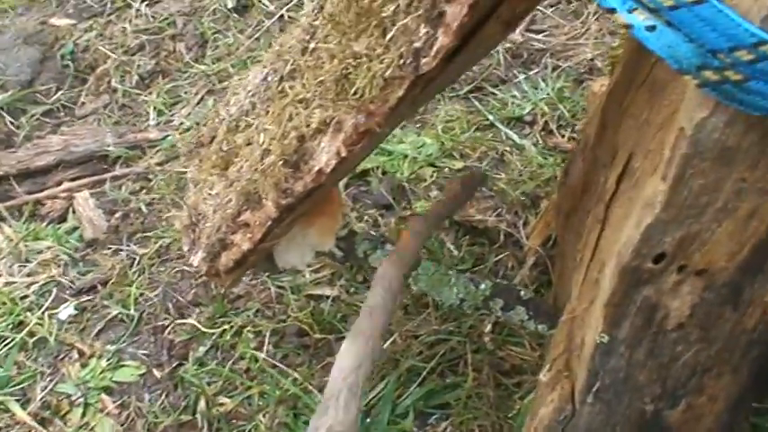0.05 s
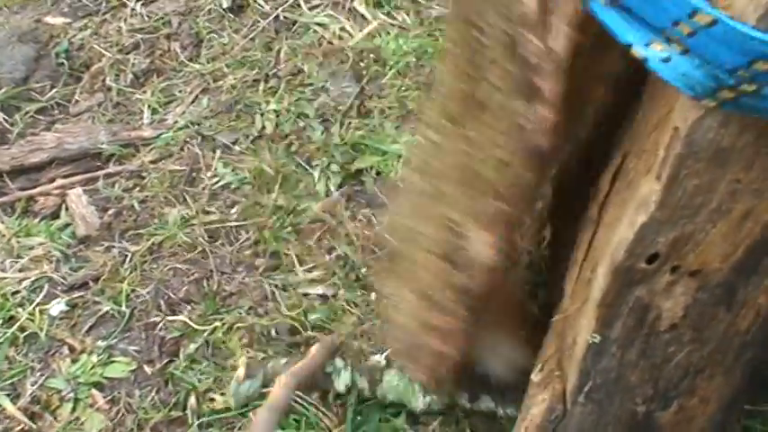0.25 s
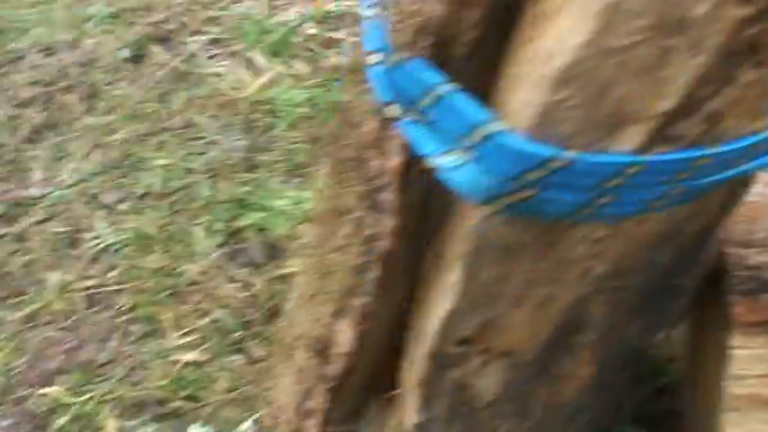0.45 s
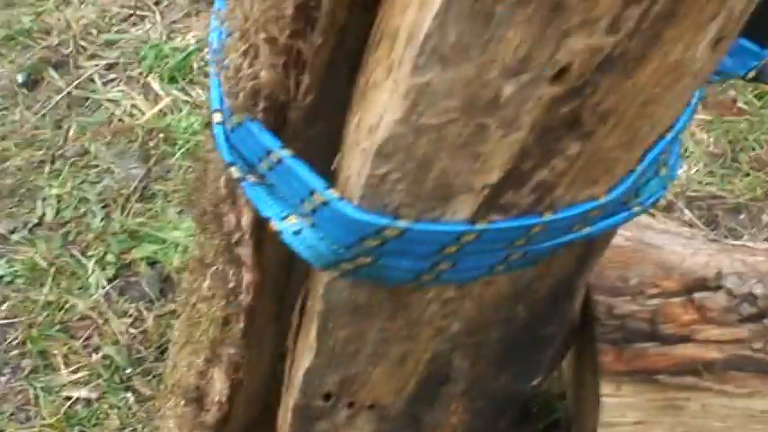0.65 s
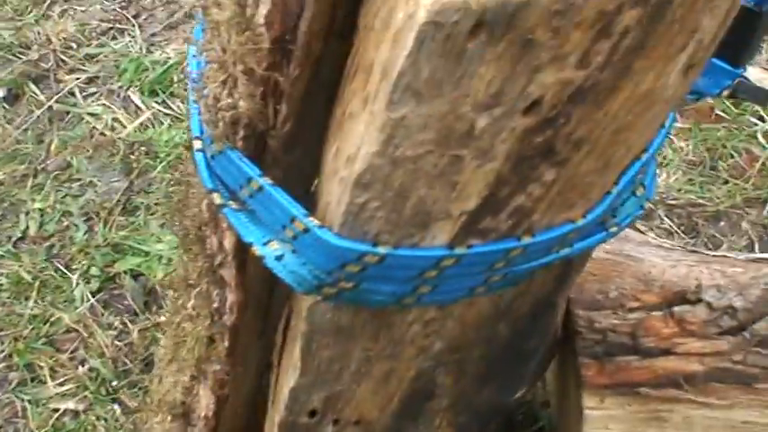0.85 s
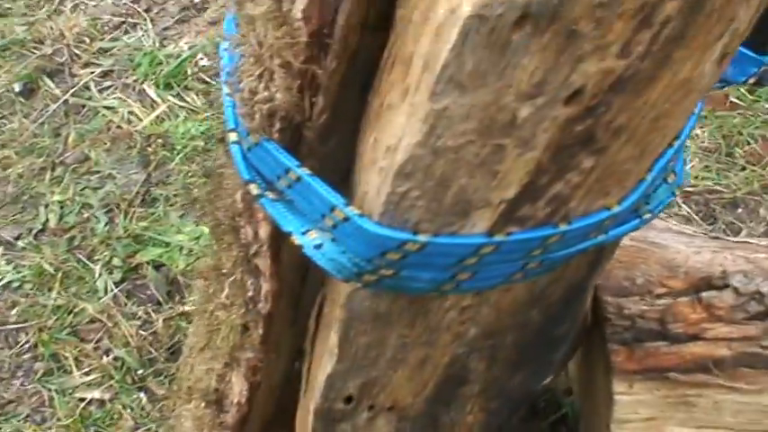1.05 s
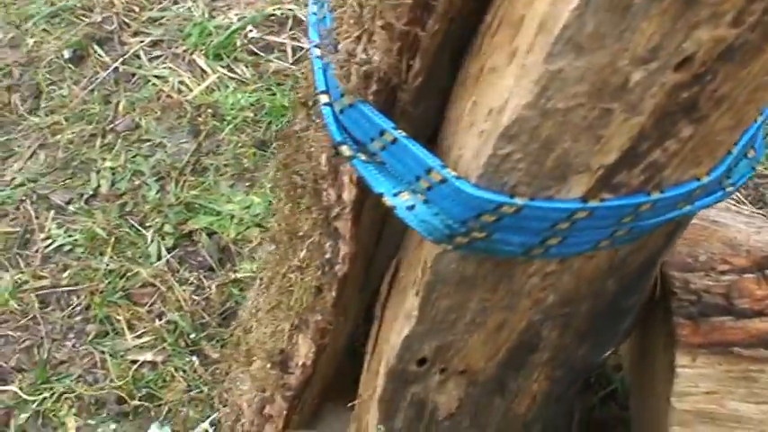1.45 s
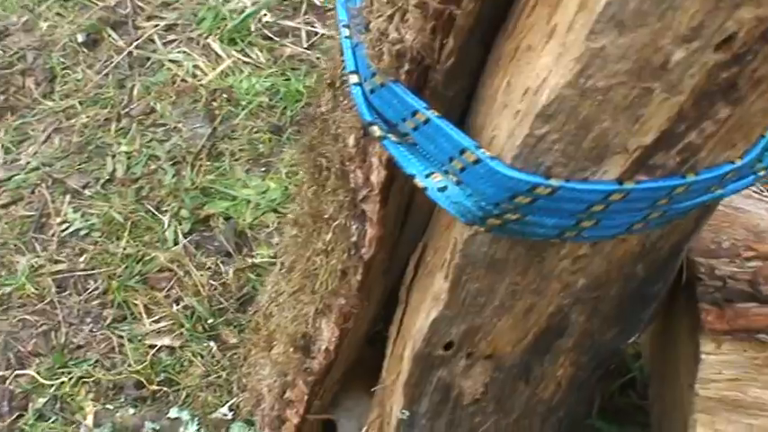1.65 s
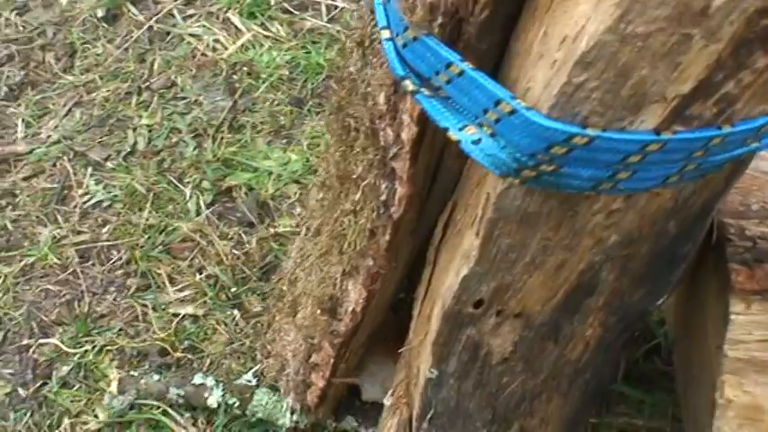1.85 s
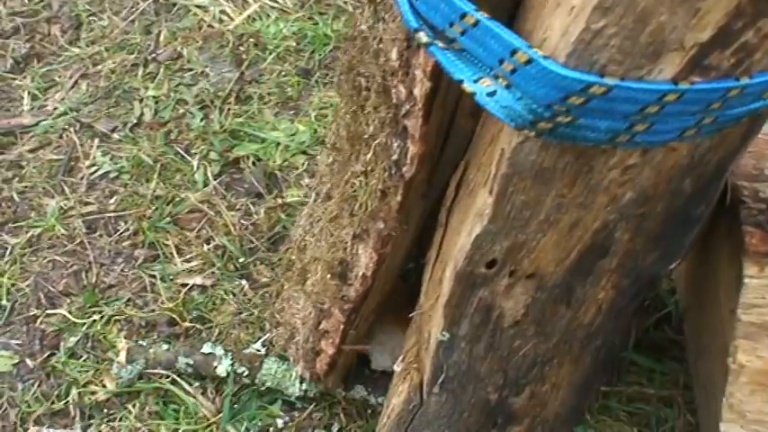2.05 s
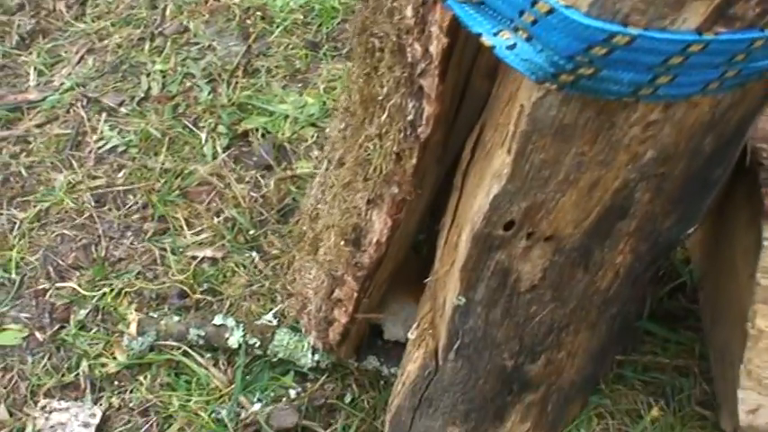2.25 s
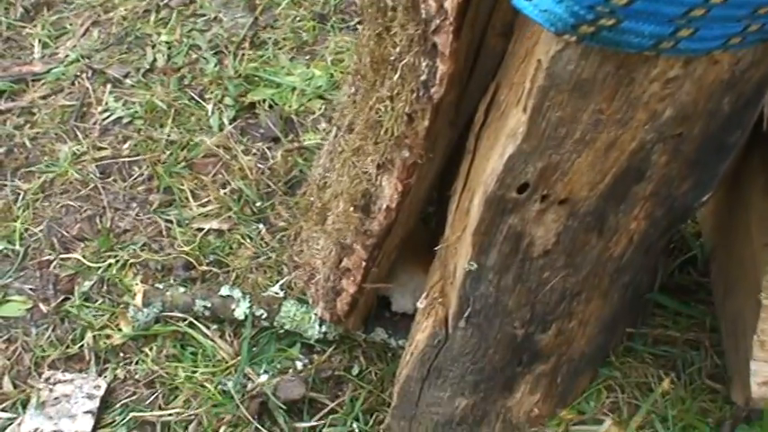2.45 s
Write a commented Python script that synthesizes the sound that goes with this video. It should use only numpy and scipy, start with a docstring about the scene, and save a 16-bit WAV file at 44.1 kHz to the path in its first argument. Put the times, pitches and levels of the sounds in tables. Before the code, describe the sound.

A wooden log trap springs shut close by. At 0.2 seconds a stick snaps free and bark scrapes; at 0.3 the log slams against a post with a loud, crunchy clack, rattling to rest by 0.5. Dry grass stirs softly around 1 second, faint birds whistle from 1.1 to 1.8, and fingers lightly tap the microphone near 1.9 and 2.4. A distant engine drones faintly throughout in quiet open air.

```python
"""A distant engine drones faintly in quiet open air; then, close by, a log trap springs shut on grass.
The trigger stick snaps away, and a split log pulled by an elastic strap scrapes inward, slams against the
post and rattles to rest. Each impact excites damped modes of the wood and a burst of fracture noise.
Afterwards dry grass stirs, small birds whistle, and fingers tap the microphone's case."""
import sys
import numpy as np
from scipy import signal
from scipy.fft import rfft, irfft
from scipy.io import wavfile

SR = 44100
rng = np.random.default_rng(int(sys.argv[2]) if len(sys.argv) > 2 else 0)


def wrap_up_sound(samples):
    """Save the sound to the file named by the first command line argument, as 16-bit audio."""
    columns = np.atleast_2d(samples).T
    # keep every value between -1 and 1, then stretch to whole-number steps
    tamed = np.clip(columns, -1, 1)
    steps = np.round(tamed * 32767).astype(np.int16)
    wavfile.write(sys.argv[1], SR, steps)


N = 110250

# The engine's fundamental. Each row: time in seconds, level in dB.
ENGINE_LEVELS = [(0, -68), (.45, -70.5), (.64, -64.5), (.95, -72.5), (1.45, -74.5), (1.71, -64.5),
                 (1.9, -71), (2.2, -70), (2.5, -62.5)]
# Open air. Each row: frequency in Hz, relative spectral level in dB.
AIR_SPECTRUM = [(15, -43), (25, -11), (80, -2), (105, -9.5), (153, -7), (185, -10.5), (301, -12.5),
                (394, -18), (754, -15.5), (1190, -19.5), (2410, -24.5), (5430, -32.5), (6920, -33.5),
                (8360, -38.5), (16000, -39)]
# Likeness of the air at the two ears. Each row: frequency in Hz, coherence from 0 to 1.
AIR_COHERENCE = [(60, 0.97), (130, .98), (290, 0.78), (640, 0.24), (1400, 0.21), (3100, 0.1), (6800, 0.26),
                 (15000, 1)]
# The trigger stick flying out. Each row: start in seconds, ring level in dB, splinter level in dB.
SNAPS = [(0.222, -18.5, -27.5), (0.2226, -30, -24.5), (0.2277, -39.5, -38.5)]
# The stick's modes. Each row: frequency in Hz, level in dB, T60 in seconds, rise in seconds.
STICK_MODES = [(287, -16, .04, 0.00217), (622, -4.5, 0.027, 0.0026), (756, -1, 0.025, 0.0024),
               (960, -7, 0.033, 0.0014), (1680, -21, .025, 0.00042), (1900, -2, 0.01, 0.00037),
               (2174, 2, 0.0075, 0.00037), (2480, -10.5, 0.0115, 0.00033), (3380, -19.5, 0.031, 0.00036),
               (5700, -5, 0.0094, .0003)]
# The hardest contacts. Each row: start in seconds, level in dB.
CRACKS = [(.2229, -28), (.3260, -26)]
# Noises of wood and bark. Each row: frequency in Hz, relative spectral level in dB.
SPLINTER_SPECTRUM = [(200, -19), (1200, -8), (2200, 6.5), (3200, -13), (4200, -6), (5000, -1), (7500, -6.5),
                     (10500, -12), (13000, -19.5), (16000, -28.5)]
CRACK_SPECTRUM = [(1500, -20), (4000, -4), (7500, 0), (10500, -4), (13500, -10), (16000, -19)]
SCRAPE_SPECTRUM = [(150, -6.5), (400, -10), (1200, -3), (3000, -8), (7500, -8.5), (12000, -11.5),
                   (16000, -25.5)]
CRUNCH_SPECTRUM = [(150, -14.5), (400, 12.5), (1500, -2), (4000, -7), (4600, -9), (6500, -9.5),
                   (8200, -9.5), (11000, -18), (16000, -40.5)]
# Scraping as the log swings. Each row: time in seconds, level in dB.
SCRAPE_LEVELS = [(0.234, -55), (0.245, -50), (.27, -55.5), (.288, -56.5), (.308, -50), (.322, -43.5),
                 (.34, -59), (.36, -63), (0.374, -79), (.395, -66.5), (.44, -79)]
# The log striking ground and post. Each row: start in seconds, ring level in dB, upper and lower
# corners in Hz, thud level in dB, crunch level in dB, rise in seconds, crunch T60 in seconds.
BLOWS = [(.2465, -37.5, 5000, 900, -27.5, -19.5, 0.000079, 0.0071),
         (0.2652, -51, 3000, 200, -44, -40, 0.00092, 0.017),
         (0.3002, -48.5, 2990, 700, -62.5, -63.5, 0.00083, .02),
         (0.3164, -25, 3500, 1106, -48, -34.5, 0.0011, 0.0224),
         (.3257, -14.5, 12000, 50, -61, -15, 0.00043, 0.019),
         (.32958, -25, 11770, 1200, -51.5, -25.5, 0.0007, 0.021),
         (0.3405, -34, 1100, 500, -55, -59.5, 0.00087, .02),
         (0.3958, -46, 2980, 600, -42, -56, 0.00062, .02),
         (0.402, -44.5, 794, 200, -49.5, -57, 0.00087, 0.023),
         (.4110, -42, 900, 200, -41.5, -67, .002, 0.017)]
# Modes of log and post, a low thud, the landing trigger stick and microphone case. Each row: frequency in Hz,
# level in dB, T60 in seconds.
LOG_MODES = [(212, -35, 0.062), (339, -9.5, 0.038), (436, -3, 0.021), (541.5, -17, 0.045), (682, -1, 0.029),
             (1171.5, 1, 0.022), (1233, -4, 0.033), (1462, -2, 0.023), (1736, -7, 0.044),
             (1922, -6.5, 0.03), (2475, -9.5, 0.035), (2945, -12.5, 0.03), (3500, -18, 0.034),
             (3770, -7.5, 0.029)]
THUD_MODES = [(172, 1.5, 0.0351), (260.5, 0.5, 0.027), (348, -8, 0.026)]
CHATTER_MODES = [(990, -2.5, 0.022), (1830, -4.5, 0.028), (2800, 0.5, 0.02), (3360, -10, .026),
                 (7000, -10, .012), (8400, -11, 0.013)]
CASE_MODES = [(473, -1, 0.016), (706, -0.81, 0.017)]
# Bark chips and twigs. Each row: start in seconds, level in dB, centre in Hz, T60 in seconds.
CHIPS = [(0.264, -38, 5530, 0.01), (.2703, -43, 11000, .01), (.3110, -45, 7500, 0.0088),
         (.3170, -29, 8180, 0.0051), (0.3824, -50.5, 5900, 0.024), (0.3963, -43, 1680, 0.012),
         (0.3997, -63, 5950, 0.014), (0.427, -70, 6000, 0.026), (.612, -64, 10000, .018),
         (1.412, -62, 5500, .015), (1.429, -69, 8000, 0.018)]
# The trigger stick landing. Each row: start in seconds, ring level in dB, splinter level in dB.
BOUNCES = [(0.3587, -48, -48.5), (0.3601, -34, -43.5), (0.362, -42, -50)]
# Dry grass. Each row: start in seconds, level in dB, centre in Hz, rise and T60 in seconds.
RUSTLES = [(.485, -62.5, 5500, 0.021, 0.19), (0.938, -56, 2210, 0.018, .24),
           (2.27, -66.5, 2000, 0.016, 0.31)]
# Bird calls. Each row: start and length in seconds, first, middle and last pitch in Hz, level in dB.
WHISTLES = [(1.148, 0.13, 6800, 7090, 6640, -75.5), (1.326, 0.12, 6730, 6880, 6520, -73),
            (1.464, 0.098, 6870, 6910, 6450, -72), (1.649, 0.13, 7930, 7200, 6520, -70.5),
            (1.07, 0.17, 2440, 2453, 2480, -76.5), (1.563, .09, 2455, 2530, 2530, -75.5)]
# Fingers on the case. Each row: start in seconds, level in dB.
TAPS = [(1.935, -48), (1.952, -48), (2.3487, -48), (2.37, -47)]
# The trap stands a little to the right. Each row: frequency in Hz, left minus right level in dB.
TRAP_BALANCE = [(60, -1.5), (200, -3.5), (700, -1.5), (1300, -3.5), (2400, 1.1), (8000, -0.5),
                (12000, -1.8)]
# Scattering by ground and trees. Each row: frequency in Hz, gain in dB.
ECHO_RESPONSE = [(80, -5), (280, 1.5), (600, -8.5), (2000, -9), (5000, -4), (16000, -8)]

ENGINE_HZ, ENGINE_DRIFT, SECOND_HARMONIC_DB = 76.8, .016, -71.5
AIR_DB, BACKGROUND_BALANCE_DB = -62, -.5  # balance is left minus right
SCRAPE_GRAIN, CRUNCH_GRAIN, CRACKLE_COHERENCE = .45, .34, .93
WHISTLE_WAVER, BIRD_ECHO_DB = .00857, -4
TRAP_ECHO_DB, LOW_CUT_HZ, TOP_HZ = -21, 160, 16500


def undb(db):
    """Amplitude ratio of a level in decibels."""
    return 10 ** (np.asarray(db) / 20)


def unit(x):
    """Normalisation to rms 1."""
    return x / np.sqrt(np.mean(x ** 2))


def times():
    """Sample times in seconds."""
    return np.arange(N) / SR


def freqs():
    """Bin frequencies in Hz."""
    return np.maximum(np.fft.rfftfreq(N, 1 / SR), 1)


def curve(points):
    """Interpolation of a table over log frequency."""
    hz, value = np.array(points, float).T
    return np.interp(np.log(freqs()), np.log(hz), value)


def shape(x, gain):
    """Filtering as multiplication of the spectrum."""
    return irfft(rfft(x) * gain, N)


def grit(grain):
    """Noise of tiny fractures with log-normal sizes; grain sets their spread."""
    size = np.exp(grain * np.repeat(rng.standard_normal(N // 24 + 1), 24)[:N])
    return unit(rng.standard_normal(N) * size)


def crackle(grain, spectrum):
    """Coloured fracture noise, partly coherent between the ears."""
    mid = grit(grain) * np.sqrt(1 + CRACKLE_COHERENCE)
    side = grit(grain) * np.sqrt(1 - CRACKLE_COHERENCE)
    return unit(shape(np.array([mid + side, mid - side]), undb(curve(spectrum))))


def band(x, hz, q):
    """A band-pass resonance, scaled to rms 1."""
    return unit(shape(x, 1 / (1 + (q * (freqs() / hz - hz / freqs())) ** 2)))


def fade(start, rise, t60):
    """A quick rise and exponential decay, 60 dB in t60 seconds."""
    age = np.maximum(times() - start, 0)
    return (1 - np.exp(-age / rise)) * np.exp(-np.minimum(np.log(1000) * age / t60, 40))


def wander(hz):
    """Low-pass random fluctuation of rms 1."""
    return unit(shape(rng.standard_normal(N), np.exp(-(freqs() / hz) ** 2) + 1e-9))


def ring(start, modes, rise):
    """Free vibration after a contact is a sum of damped modes."""
    out, first = np.zeros(N), int(start * SR)
    age = np.arange(min(SR // 6, N - first)) / SR
    tone = sum(undb(db) * np.sin(2 * np.pi * hz * age) * np.exp(-np.log(1000) * age / t60)
               for hz, db, t60 in modes)
    out[first:first + len(age)] = tone * (1 - np.exp(-age / rise))
    return out


def scatter(x, rise, t60):
    """Diffuse reflection: convolution with a different decaying noise at each ear."""
    tail = rng.standard_normal((2, N)) * fade(0, rise, t60)
    tail /= np.sqrt(np.sum(tail ** 2, axis=1, keepdims=True))
    return signal.fftconvolve(np.atleast_2d(x), tail, axes=1)[:, :N]


def engine():
    """A nearly periodic source: two harmonics drift together in pitch and vary in level."""
    phase = 2 * np.pi * np.cumsum(ENGINE_HZ * (1 + ENGINE_DRIFT * wander(hz=5.44))) / SR
    fundamental = undb(np.interp(times(), *np.array(ENGINE_LEVELS).T)) * unit(np.sin(phase))
    second = unit(np.sin(2 * phase) * undb(2.2 * wander(hz=4)))
    return fundamental + undb(SECOND_HARMONIC_DB) * second


def open_air():
    """Ambient noise whose coherence between the ears depends on frequency."""
    coherence, colour = curve(AIR_COHERENCE), undb(curve(AIR_SPECTRUM))
    mid = shape(rng.standard_normal(N), colour * np.sqrt(1 + coherence))
    side = shape(rng.standard_normal(N), colour * np.sqrt(1 - coherence))
    return undb(AIR_DB) * unit(np.array([mid + side, mid - side])) * undb(.7 * wander(hz=7))


def trigger_stick():
    """Fracture frees the stick; its bending modes build up just after the splintering."""
    out = 0
    for start, ring_db, splinter_db in SNAPS:
        splinter = crackle(0, SPLINTER_SPECTRUM) * fade(start, rise=.00014, t60=.01)
        bending = sum(ring(start, [(hz, db, t60)], rise) for hz, db, t60, rise in STICK_MODES)
        out += undb(splinter_db) * splinter + undb(ring_db) * bending
    return out


def cracks():
    """Hard wood meets hard wood: so brief a contact has a broad, bright spectrum."""
    return sum(undb(db) * crackle(0, CRACK_SPECTRUM) * fade(start, rise=.0001, t60=.004)
               for start, db in CRACKS)


def bark_scrape():
    """Sliding friction on rough bark makes gritty noise during the swing."""
    level_db = np.interp(times(), *np.array(SCRAPE_LEVELS).T, left=-np.inf, right=-np.inf)
    return crackle(SCRAPE_GRAIN, SCRAPE_SPECTRUM) * undb(level_db)


def log_blows():
    """Impacts excite log modes, give a low thud and crush bark; soft blows are dull, glancing ones thin."""
    out = 0
    for start, ring_db, dull_hz, thin_hz, thud_db, crunch_db, rise, crunch_t60 in BLOWS:
        modes = [(hz, db - 10 * np.log10((1 + (hz / dull_hz) ** 4) * (1 + (thin_hz / hz) ** 2)), t60)
                 for hz, db, t60 in LOG_MODES]
        wood = undb(ring_db) * ring(start, modes, rise)
        thud = undb(thud_db) * ring(start, THUD_MODES, rise=.00096)
        crunch = undb(crunch_db) * crackle(CRUNCH_GRAIN, CRUNCH_SPECTRUM) * fade(start, rise, crunch_t60)
        out += wood + thud + crunch
    return out


def chips():
    """Bark chips and twigs flick off, each a transient of band-limited noise."""
    return sum(undb(db) * band(rng.standard_normal(N), hz, q=1.72) * fade(start, .0003, t60)
               for start, db, hz, t60 in CHIPS)


def chatter():
    """The trigger stick comes down and rebounds, each contact exciting its modes anew."""
    out = 0
    for start, ring_db, splinter_db in BOUNCES:
        splinter = crackle(0, SPLINTER_SPECTRUM) * fade(start, rise=.00035, t60=.015)
        out += undb(ring_db) * ring(start, CHATTER_MODES, rise=.00057) + undb(splinter_db) * splinter
    return out


def grass():
    """Many tiny contacts in dry grass merge into broad bands of noise."""
    return sum(undb(db) * band(grit(grain=.3), hz, q=.95) * fade(start, rise, t60)
               for start, db, hz, rise, t60 in RUSTLES)


def birds():
    """Near-pure tones, modulated in frequency and amplitude, reverberate among the trees."""
    calls, waver = 0, 1 + WHISTLE_WAVER * wander(hz=70)
    for start, length, first_hz, middle_hz, last_hz, db in WHISTLES:
        progress = np.clip((times() - start) / length, 0, 1)
        glide = np.polyfit([0, .5, 1], [first_hz, middle_hz, last_hz], 2)
        hz = np.polyval(glide, progress) * waver
        swell = np.abs(np.sin(np.pi * progress)) ** .5
        calls += undb(db) * swell * np.sin(2 * np.pi * np.cumsum(hz) / SR)
    calls *= undb(3.6 * wander(hz=45))
    return calls + undb(BIRD_ECHO_DB) * scatter(calls, rise=.013, t60=.33)


def finger_taps():
    """Structure-borne sound: fingers excite the modes of the microphone's case."""
    return sum(undb(db) * ring(start, CASE_MODES, rise=.00032) for start, db in TAPS)


def scene():
    """Superposition of the trap's direct sound, its faint echo and the surroundings."""
    sides = np.array([[.5], [-.5]])  # half of a level difference goes to each ear
    low_cut = signal.butter(3, LOW_CUT_HZ, "high", fs=SR, output="sos")
    trap = signal.sosfilt(low_cut, trigger_stick() + log_blows() + chatter()
                          + bark_scrape() + chips() + cracks())
    direct = shape(trap, undb(sides * curve(TRAP_BALANCE)))
    echo = undb(TRAP_ECHO_DB) * scatter(shape(trap, undb(curve(ECHO_RESPONSE))), rise=.01, t60=.46)
    small_sounds = grass() + birds() + finger_taps()
    background = (engine() + open_air()) * undb(sides * BACKGROUND_BALANCE_DB)
    return direct + echo + small_sounds + background


def record(dry):
    """Soft saturation rounds the highest peaks, and a low-pass filter cuts the top."""
    ceiling = undb(-6)
    low_pass = signal.ellip(8, .2, 70, TOP_HZ, fs=SR, output="sos")
    return signal.sosfilt(low_pass, ceiling * np.tanh(dry / ceiling))


dry = scene()
out = record(dry)
wrap_up_sound(out)
```